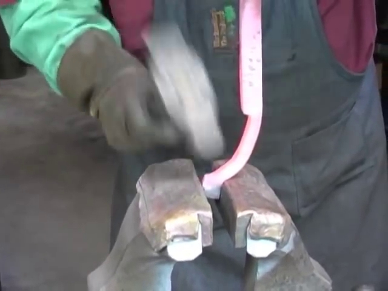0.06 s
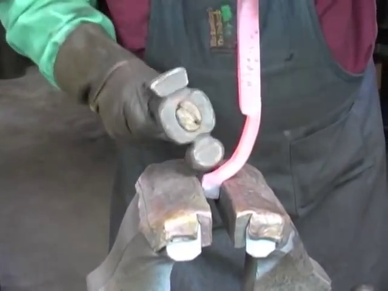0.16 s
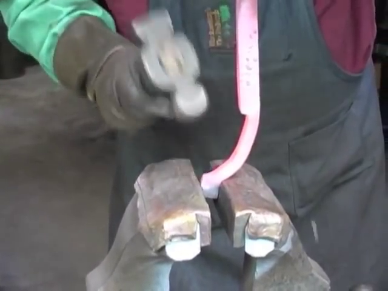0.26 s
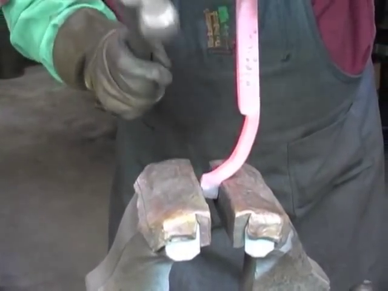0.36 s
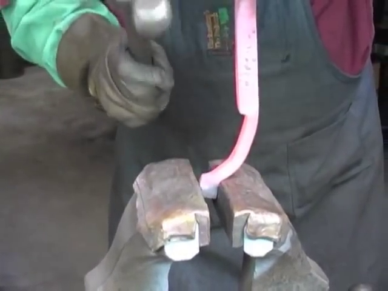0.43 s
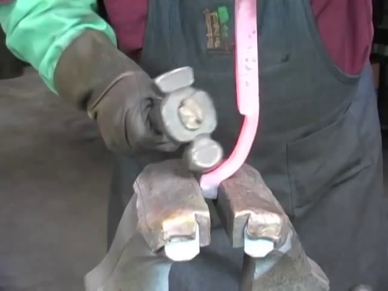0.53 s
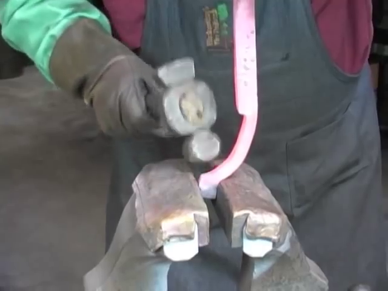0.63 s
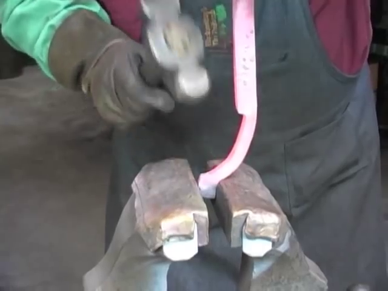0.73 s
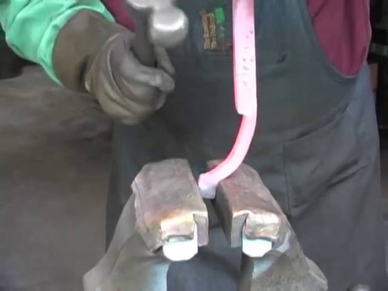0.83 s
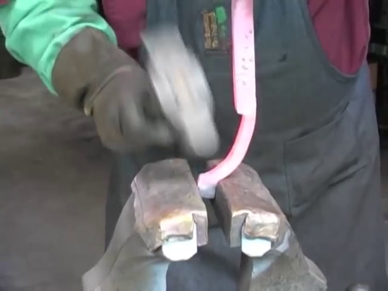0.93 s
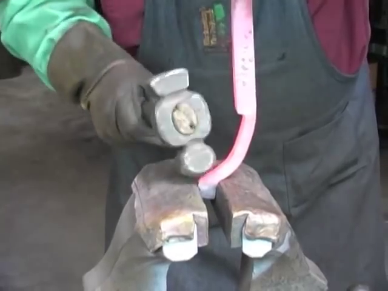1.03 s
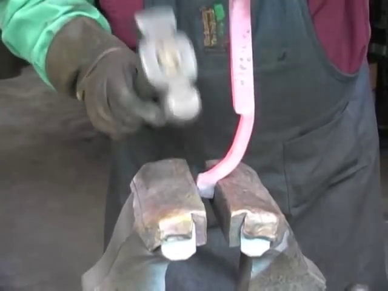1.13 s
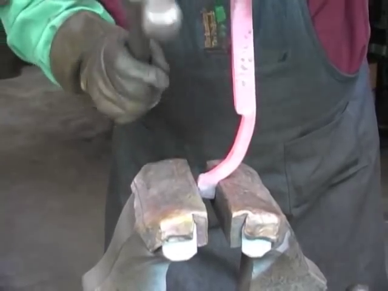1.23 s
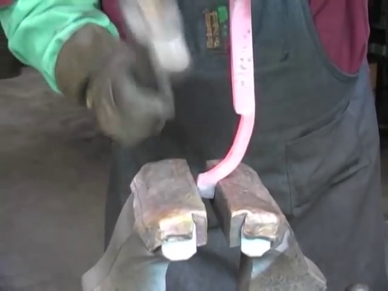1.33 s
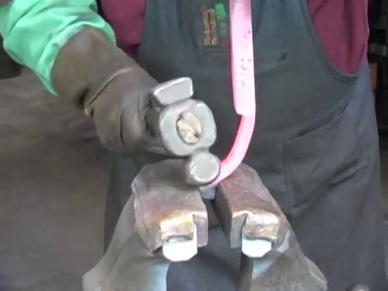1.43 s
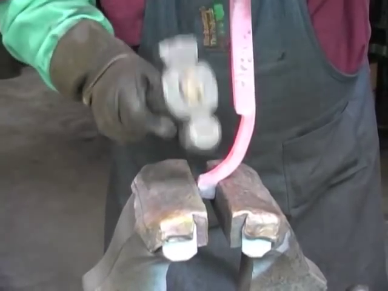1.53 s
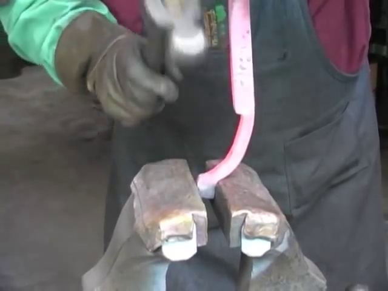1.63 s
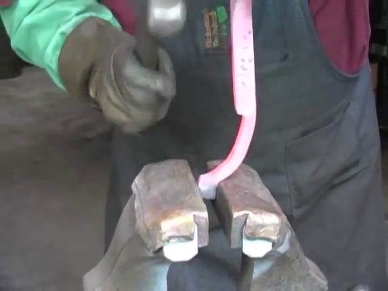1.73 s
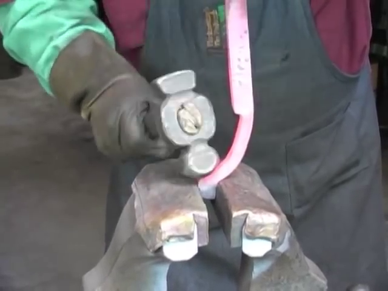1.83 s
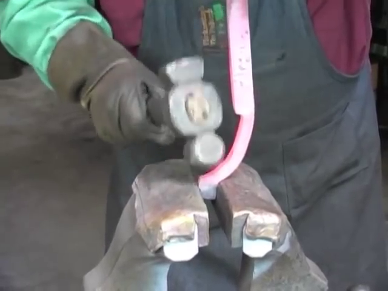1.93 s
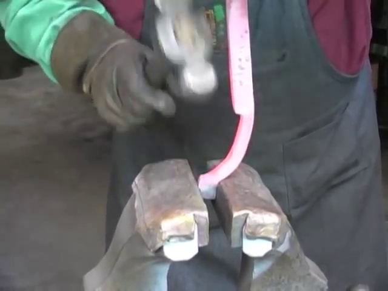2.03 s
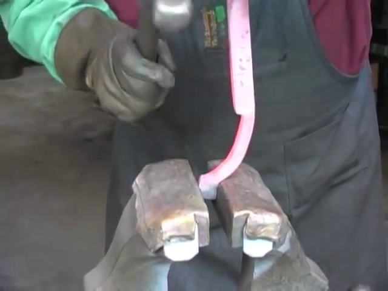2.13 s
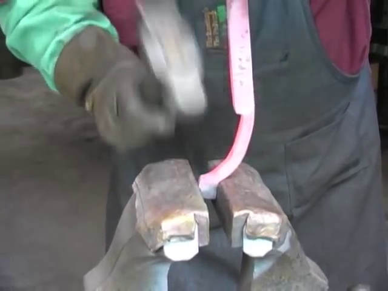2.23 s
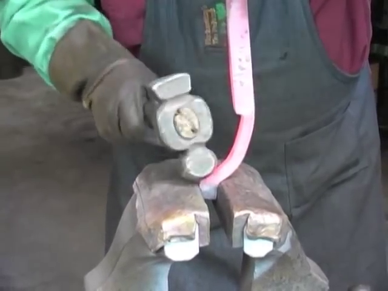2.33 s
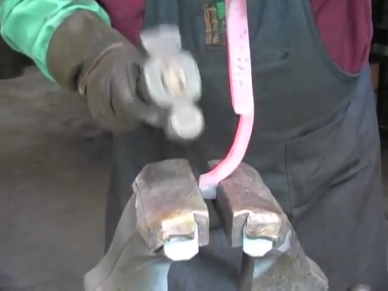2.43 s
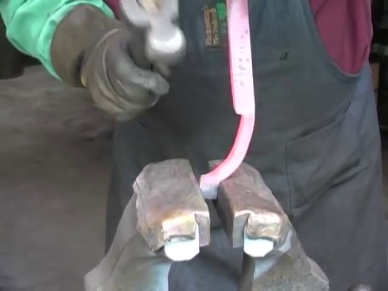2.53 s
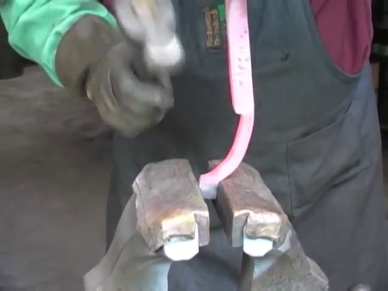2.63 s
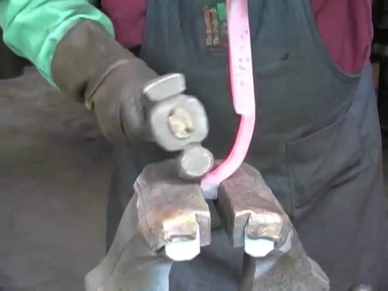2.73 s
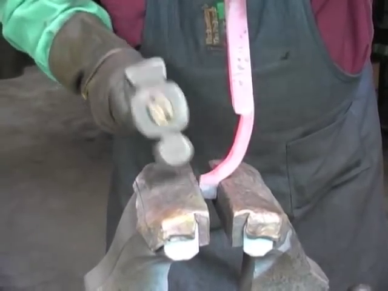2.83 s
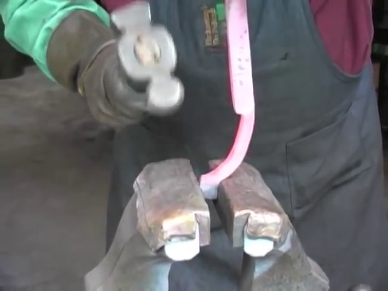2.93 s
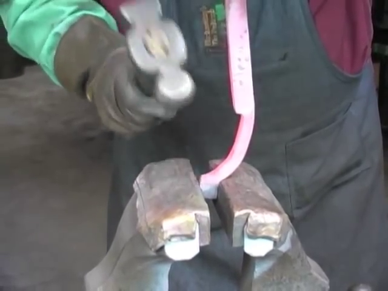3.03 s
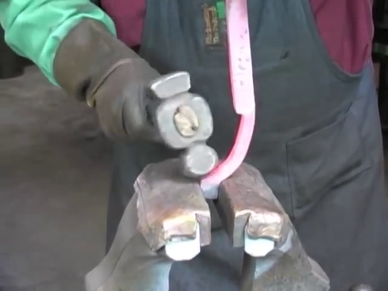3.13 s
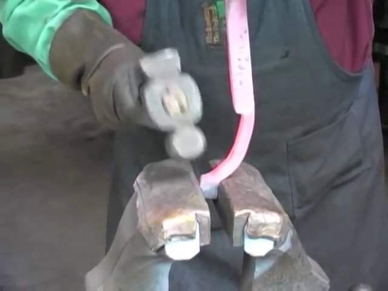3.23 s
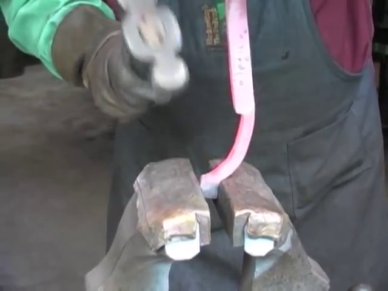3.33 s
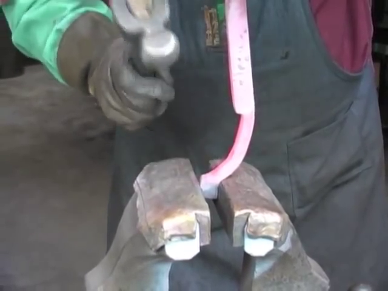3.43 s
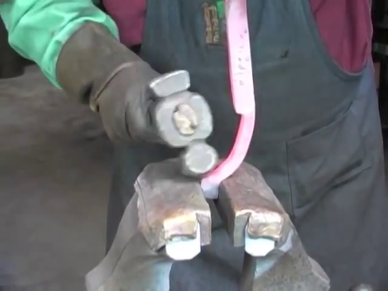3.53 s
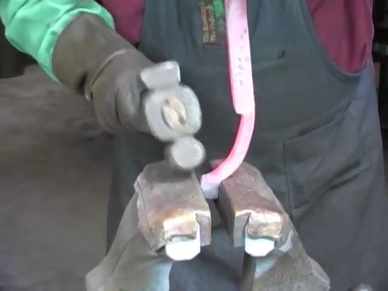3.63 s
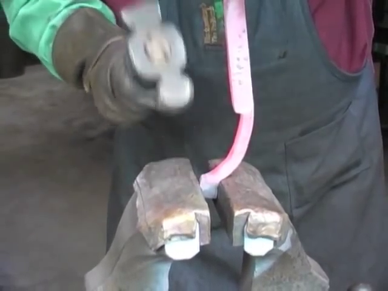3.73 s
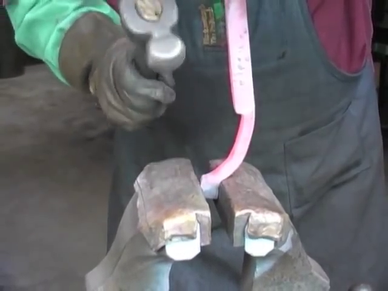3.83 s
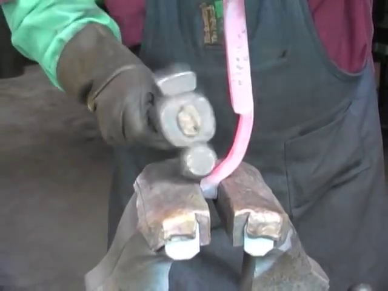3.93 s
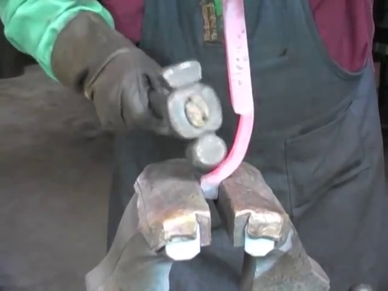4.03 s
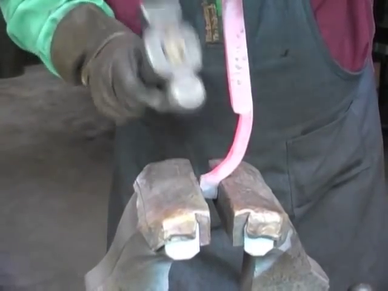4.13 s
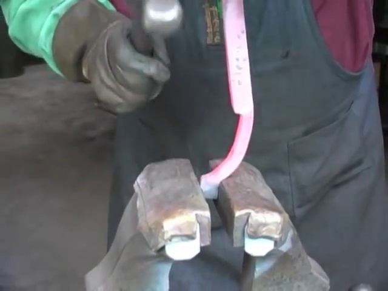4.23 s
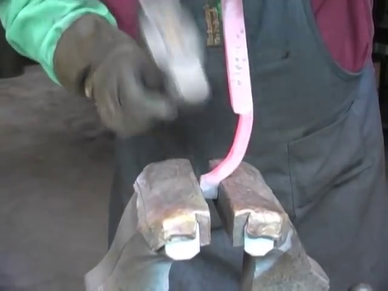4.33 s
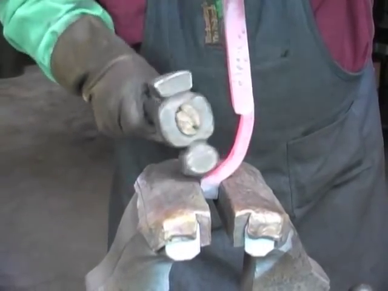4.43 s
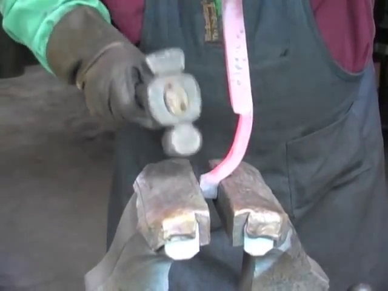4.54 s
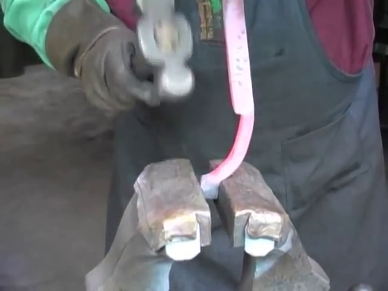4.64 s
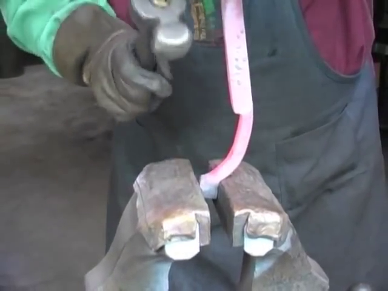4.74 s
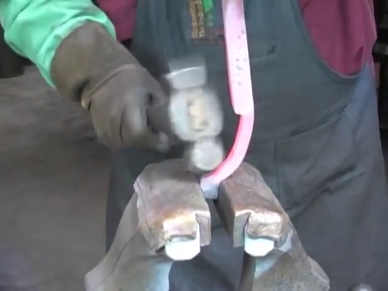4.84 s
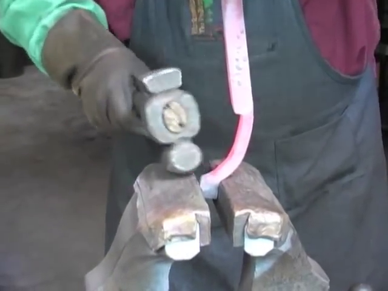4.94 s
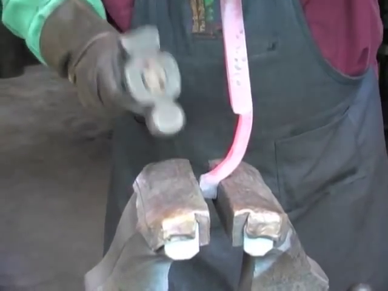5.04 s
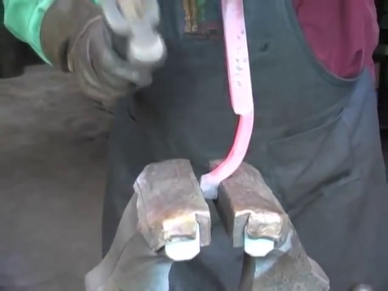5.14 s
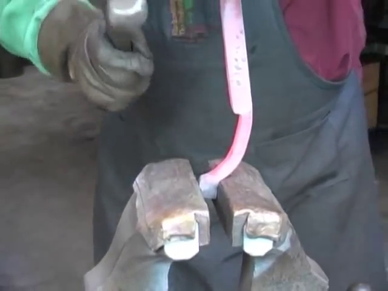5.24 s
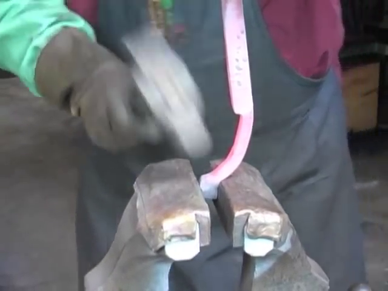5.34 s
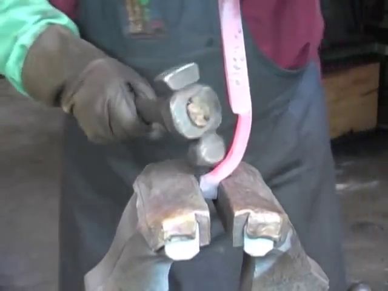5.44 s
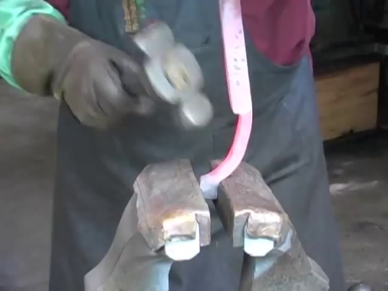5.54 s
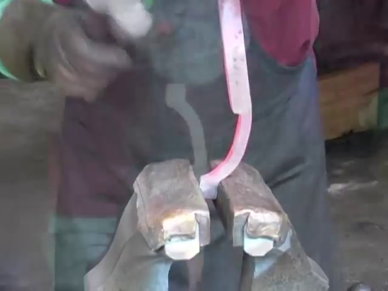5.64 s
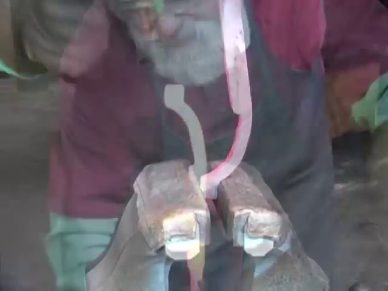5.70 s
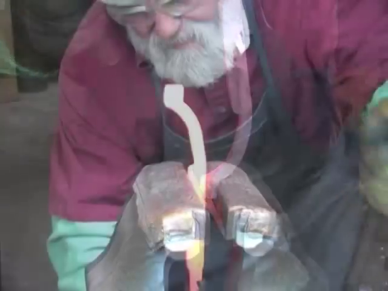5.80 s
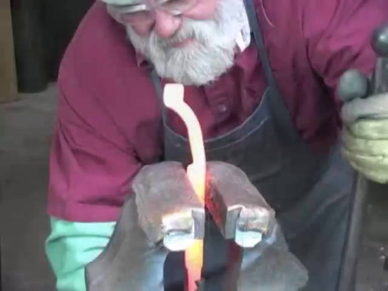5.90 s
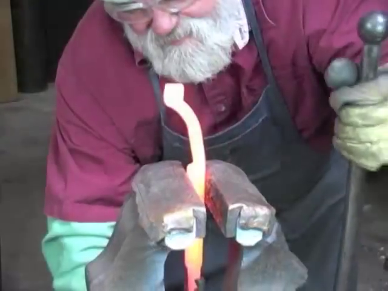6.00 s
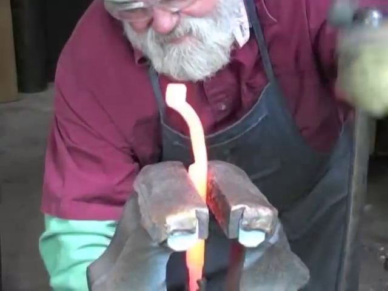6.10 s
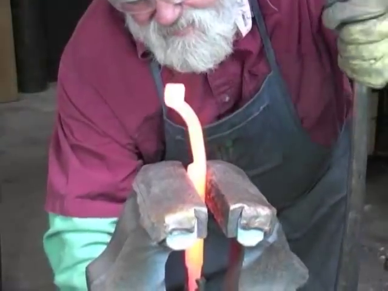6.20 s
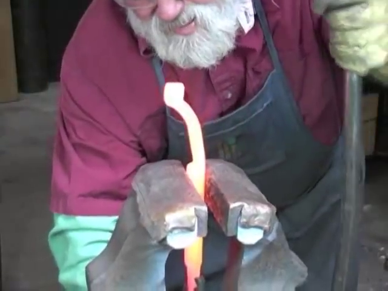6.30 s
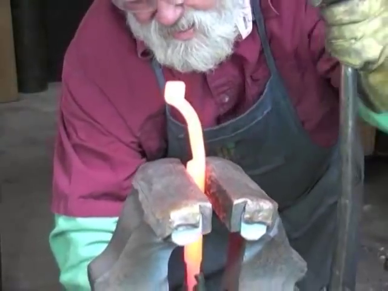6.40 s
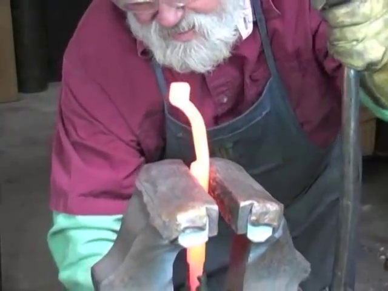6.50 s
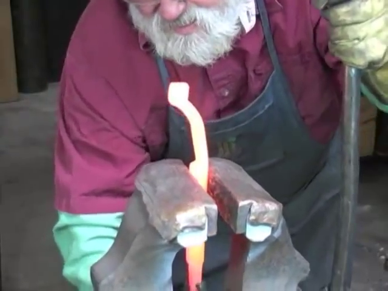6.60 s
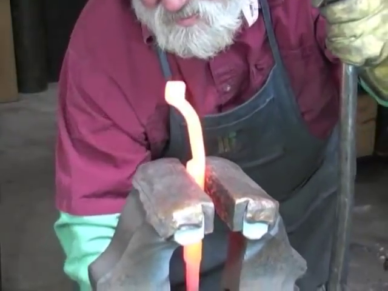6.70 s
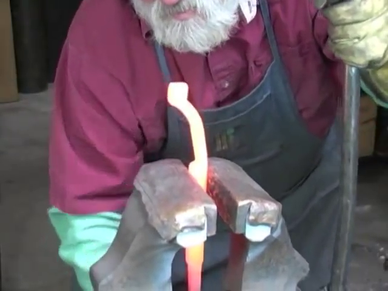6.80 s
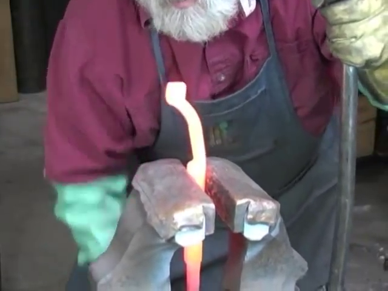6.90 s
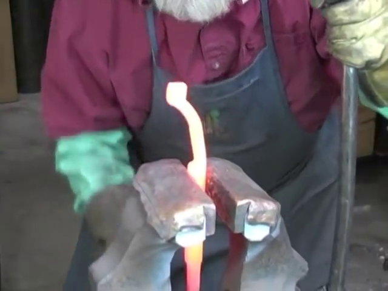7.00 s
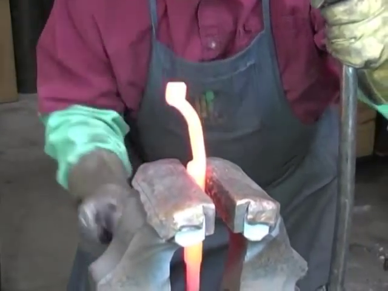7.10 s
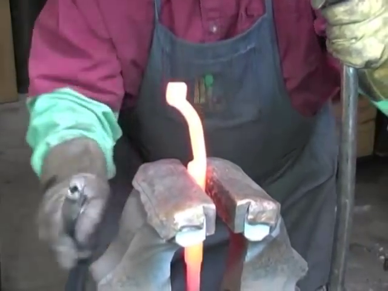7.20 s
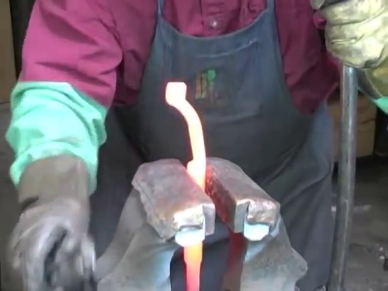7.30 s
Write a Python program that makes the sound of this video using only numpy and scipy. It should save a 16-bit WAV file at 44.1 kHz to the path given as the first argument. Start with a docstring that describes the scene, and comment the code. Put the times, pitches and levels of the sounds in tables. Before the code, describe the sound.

A hand hammer strikes hot steel in a vise with thirteen steady bright clanks over a low machine hum, then a few light tool knocks.

```python
"""A smith bends a red-hot bar in a leg vise with thirteen blows of a hand hammer, in a forge workshop.
Each blow is a short noisy clank plus ringing steel modes, a low thump of the stand and a room echo.
A shop machine runs throughout: filtered noise for its rumble, a wavering tone for its whine, with a
rush of air around it. Near the end come four light knocks of handled tools, each a tick and one ring."""
import sys
import numpy as np
from scipy import signal
from scipy.fft import rfft, irfft, next_fast_len
from scipy.io import wavfile

SR = 44100
rng = np.random.default_rng(int(sys.argv[2]) if len(sys.argv) > 2 else 0)


def output_pcm(signal):
    """Save a mono or channel-first signal as 16-bit PCM at the path in sys.argv[1].

    Samples are clipped to [-1, 1] before scaling.
    """
    pcm = np.clip(np.atleast_2d(signal).T, -1, 1) * 32767
    wavfile.write(sys.argv[1], SR, np.round(pcm).astype(np.int16))


N = 324562  # length of the scene in samples
TIME = np.arange(N) / SR  # seconds from the start of the scene
AGE = np.arange(24000) / SR  # seconds from the start of one short sound
LEFT_RIGHT = np.array([[1], [-1]])  # adds a side signal on the left, subtracts it on the right


def undb(db):
    """Turn decibels into a gain."""
    return 10 ** (np.asarray(db) / 20)


def unit(x):
    """Scale a sound to rms 1."""
    return x / np.sqrt(np.mean(x ** 2))


def fade(t60):
    """Free decay that loses 60 dB in t60 seconds."""
    return np.exp(-np.log(1000) * AGE / max(t60, 1e-3))


def ring(hz, t60):
    """One struck mode: a dying sine that starts at a random phase."""
    phase = rng.uniform(0, 2 * np.pi)
    return np.sin(2 * np.pi * hz * AGE + phase) * fade(t60)


def bell(hz, centre_hz, octaves):
    """A smooth hump on the log-frequency axis, 1 at its centre."""
    distance = np.log2((hz + 1) / centre_hz)
    return np.exp(-.5 * (distance / octaves) ** 2)


def curve(points):
    """Gain as a function of frequency, through (frequency [Hz], level [dB]) points."""
    hz, db = np.transpose(points)[:2]
    return lambda f: undb(np.interp(np.log(f + 1), np.log(hz), db))


def noise(gain, size):
    """Noise of rms 1 whose spectrum follows gain(Hz)."""
    length = next_fast_len(size, real=True)
    f = np.fft.rfftfreq(length, 1 / SR)
    spectrum = gain(f) * rfft(rng.standard_normal(length))
    return unit(irfft(spectrum, length)[:size])


def spread(source, side_db):
    """Two random draws of a source become the middle and the sides of a stereo pair."""
    return source() + undb(side_db) * source() * LEFT_RIGHT


def add(track, s, sound):
    """Mix a short sound into the track from time s on."""
    i = int(s * SR)
    track[:, i:i + len(AGE)] += sound[..., :N - i]


def machine(whine_hz=2474, air_db=-72):
    """A running machine: rumble in narrow resonances, a thin whine and a smooth rush of air."""
    # rumble in the room's low resonances: (frequency [Hz], width [Hz], relative level [dB])
    hum = [(81, 10, -83), (149, 14, -79), (169.1, 23, -73), (227, 10, -77.5), (241, 17, -77),
           (283, 77, -78), (352.2, 24.4, -76), (379.7, 11, -80.5), (443, 110, -77.5), (652, 21, -86.5)]
    # rush of air in the shop: (frequency [Hz], relative level per Hz [dB])
    air_colour = [(25, -2.5), (42, -10.5), (120, 9), (300, 7.5), (480, 6.5), (620, 3.5), (1000, -1),
                  (1500, 1), (2100, -1.5), (4500, -4), (7000, -7.5), (12000, -10), (13900, -9),
                  (14600, -29)]
    # machine level; the background level dips briefly near 5.78 s: (time [s], rumble [dB], whine [dB])
    levels = [(0, -65, -81), (5.55, -64, -78), (5.779, -70.5, -80), (6, -66.5, -78), (7.36, -66.5, -74.5)]

    def resonances(f):
        return sum(undb(db) / np.sqrt(width) / (1 + (2 * (f - hz) / width) ** 2)
                   for hz, width, db in hum)

    s, *columns = np.transpose(levels)
    rumble_db, whine_db = (np.interp(TIME, s, column) for column in columns)
    rumble = undb(rumble_db) * spread(lambda: noise(resonances, N), side_db=-17.5)
    # one slow random waver, mostly around 4 Hz, moves both the level and the phase of the whine
    waver = noise(lambda f: bell(f, 4.4, 1.5), N)
    tone = np.sin(2 * np.pi * whine_hz * TIME + .2 * waver)
    whine = undb(whine_db + .8 * waver) * tone
    air = undb(air_db) * spread(lambda: noise(curve(air_colour), N), side_db=-3.5)
    return rumble + whine + air


def echo(side_db=-6, build_s=0.0021):
    """Diffuse response of the workshop: it builds up within milliseconds and the treble dies first."""
    # workshop echo by band: (centre frequency [Hz], relative level [dB], time to fall 60 dB [s])
    room = [(98, -0.5, 0.72), (510, 3.5, 0.49), (1840, 0.5, 0.62), (3640, -1, 0.47), (6500, -4.5, 0.45),
            (9850, -5.5, 0.38), (14000, -4, 0.29)]
    centres = np.log([row[0] for row in room])
    f = np.fft.rfftfreq(len(AGE), 1 / SR)
    white = rfft(spread(lambda: noise(np.ones_like, len(AGE)), side_db))
    tail = 0
    # each row of the identity matrix picks one band, which overlaps smoothly with its neighbours
    for share, (_, db, t60) in zip(np.eye(len(room)), room):
        band = irfft(white * np.interp(np.log(f + 1), centres, share), len(AGE))
        tail = tail + undb(db) * fade(t60) * band
    tail = tail * (1 - np.exp(-AGE / build_s))
    # bring the mean energy of the two channels to 1
    return tail / np.sqrt(np.sum(tail ** 2) / 2)


def reflect(x, response):
    """What the room returns of a sound: every sample of it starts its own echo."""
    return signal.fftconvolve(x[None], response, axes=1)[:, :len(x)]


def tools(soft_hz=12500):
    """Light knocks of iron, a tick and one small ring; gentle contact leaves out the highest treble."""
    # (time [s], tick level [dB], tick centre [Hz], tick width [octaves], tick time to fall 60 dB [s],
    #  ring frequency [Hz], ring level [dB], room level relative to the knock [dB])
    knocks = [(6.0254, -45, 5060, 1.95, 0.083, 3040, -57, -22),
              (6.2043, -58.5, 2500, 0.89, 0.034, 3990, -52.5, -7),
              (6.216, -62, 4330, 0.14, 0.032, 2410, -56, -7),
              (6.9464, -66, 8000, 0.7, 0.13, 7390, -63.5, 1)]
    out, sent = np.zeros((2, N)), np.zeros((2, N))
    for s, db, hz, octaves, t60, ring_hz, ring_db, room_db in knocks:
        hiss = noise(lambda f: bell(f, hz, octaves) / (1 + (f / soft_hz) ** 12), len(AGE))
        tick = undb(db) * hiss * fade(t60)
        knock = tick + undb(ring_db) * ring(ring_hz, 1.03 * t60)
        add(out, s, knock)
        add(sent, s, undb(room_db) * knock)
    return out + reflect(sent[0], echo())


def thump(jolt_db, follow=.4):
    """The jolt runs down the stand: a few damped low swings from zero; the first follows it most."""
    # low modes of the vise stand: (frequency [Hz], level before the jolt [dB], time to fall 60 dB [s])
    stand = [(36.75, -54, 0.03), (89, -50.5, 0.092), (178, -57, 0.24)]
    # only a share of the jolt's dB reaches the higher modes
    jolts = [jolt_db] + [follow * jolt_db] * (len(stand) - 1)
    return sum(undb(db + jolt) * np.sin(2 * np.pi * hz * AGE) * fade(t60)
               for (hz, db, t60), jolt in zip(stand, jolts))


def manner(s, db, soft_s=0.99):
    """A soft bar cushions the first blows; force shifts the ring from the low modes to the jaw."""
    # the bar is softest at first and stiffens over about soft_s seconds
    softness = np.exp(-(s / soft_s) ** 2)
    # the factors of db are dB of change per dB of blow level
    low_ring_db = 0.5 - 0.72 * db
    bright_db = 0.9 - 6 * softness
    jaw_db = -2.5 + 1.5 * db - 11.5 * softness
    return low_ring_db, bright_db, jaw_db


def blow(low_db, bright_db, jaw_db, overtone_hz, overtone_db, t60, bite_db=-4, jaw_hz=3018,
         scatter_db=1.5, detune=0.00096, crush_s=0.005):
    """The hammer crushes the soft bar for a few milliseconds; gives the clank and the steel's ring."""
    # modes of vise, bar and hammer head: (frequency [Hz], relative level [dB], time to fall 60 dB [s])
    steel = [(1014, -2, 0.029), (1650, -12, 0.065), (1672.4, 1, 0.078), (1719, -6.5, 0.17),
             (1753, -3.5, 0.11), (1860, -16, 0.44), (1967, -18, 0.32), (2717, -25.5, .08),
             (3035, -4, 0.018), (3870, 0.5, 0.069), (3960, 5.5, 0.061), (4180, -19.5, 0.017),
             (4740, -3, 0.12), (5640, -30.5, 0.061), (6030, 4, 0.041), (5960, -20, 0.079),
             (7100, -22.5, 0.14), (7020, 0, 0.082), (6600, -12, 0.023), (7440, -10, 0.032),
             (7750, 4.5, 0.04), (7800, -8.5, 0.041), (8440, -5, .035), (8950, -1, 0.13), (10770, -23, .06),
             (10904, 8.5, 0.035), (12860, -3.5, 0.057)]
    # the dense, quickly damped modes of a blow: (frequency [Hz], relative level [dB])
    clank_colour = [(60, -9.5), (200, -4.5), (500, -8.5), (800, -6.5), (1200, -5), (1700, -3), (2200, -3),
                    (3400, 0), (4200, 6.5), (5400, 0.5), (7300, 4.5), (9700, -3), (12800, -5), (15500, -37)]

    def colour(f):
        low = low_db * bell(f, 1700, 0.11)
        bite = bite_db * bell(f, 4120, 0.26)
        bright = bright_db * bell(f, 11500, 0.4)
        return undb(low + bite + bright)

    # the soft steel damps most modes at once
    contact = 1 / (1 + (AGE / crush_s) ** 4)
    clank = noise(lambda f: curve(clank_colour)(f) * colour(f), len(AGE))
    clank = clank * (undb(-31.5) * contact + undb(-31.0) * fade(t60))
    # each blow lands on a different spot, weights the modes anew and favours two of them
    modes = 0
    for hz, db, life in steel:
        level = undb(db + scatter_db * rng.standard_normal()) * colour(hz)
        modes = modes + level * ring(hz * (1 + detune * rng.standard_normal()), life)
    jaw = undb(jaw_db - 32.0) * ring(jaw_hz, t60=0.088)
    overtone = undb(overtone_db - 36.5) * ring(overtone_hz, t60=0.06)
    attack = 1 - np.exp(-AGE / 0.00049)
    return attack * clank, attack * (undb(-39) * modes + jaw + overtone)


def hammering(boom_hz=176, boom_db=-56, room_db=-9.5, side_db=-12, far_ring_db=-4):
    """All the blows, close by: struck steel with its thump, a low boom and its echo."""
    # where a blow lands decides how it jolts the stand and which overtone it favours:
    # (time [s], relative level [dB], relative thump [dB], overtone frequency [Hz],
    #  relative overtone level [dB], clank time to fall 60 dB [s])
    blows = [(0.1549, 0.5, 17, 8930, 4, 0.075), (0.5961, -3, -10, 6830, 6, .085),
             (1.0250, -1.5, -8, 9000, 10.5, 0.096), (1.4595, -5, -9, 6750, -2, 0.12),
             (1.8970, 0.5, -7, 9000, 0.5, 0.076), (2.3434, 1.5, 16.5, 7100, 9.5, 0.1),
             (2.7767, 0.5, -12, 6880, 1.5, .085), (3.1790, -1.5, 20, 3905, 4.5, 0.073),
             (3.5965, 0, 1.5, 7500, 0.5, 0.094), (4.0112, 1, -2, 6230, 9, 0.061),
             (4.4490, -3, -15, 10700, 5.5, 0.083), (4.9127, 0.5, 2, 3940, 3.5, 0.059),
             (5.4297, 0, 2, 4735, 9.5, 0.12)]
    out = np.zeros((2, N))
    for s, db, thump_db, overtone_hz, overtone_db, t60 in blows:
        low_db, bright_db, jaw_db = manner(s, db)
        # the steel radiates a different mix of its modes in each direction: one middle, one side draw
        rays = [blow(low_db, bright_db, jaw_db, overtone_hz, overtone_db, t60) for _ in range(2)]
        middle, side = (clank + rings for clank, rings in rays)
        direct = middle + undb(side_db) * side * LEFT_RIGHT
        # the clank fills the room, the ring carries less far; every draw gets a fresh echo
        returned = sum(reflect(clank + undb(far_ring_db) * rings, echo()) for clank, rings in rays)
        low = thump(thump_db) + undb(boom_db) * ring(boom_hz, t60=0.42)
        add(out, s, undb(db) * (direct + low + undb(room_db) * returned))
    return out


def scene(right_db=4):
    """All the sounds together, a little to the right: that channel is right_db louder than the left."""
    balance = undb(np.array([[-right_db], [right_db]]) / 2)
    return (hammering() + tools() + machine()) * balance


def record(dry, ceiling=0.2, top_hz=15000):
    """Round the sharpest peaks smoothly below the ceiling, then cut the treble above top_hz."""
    rounded = ceiling * np.tanh(dry / ceiling)
    low_pass = signal.ellip(8, .2, 70, top_hz, fs=SR, output="sos")
    return signal.sosfilt(low_pass, rounded)


dry = scene()
out = record(dry)
output_pcm(out)
```